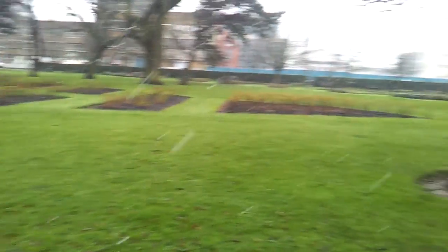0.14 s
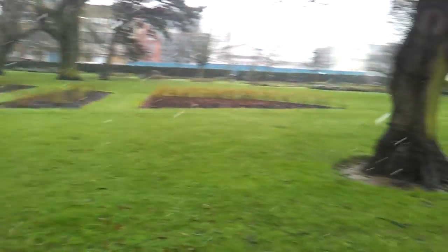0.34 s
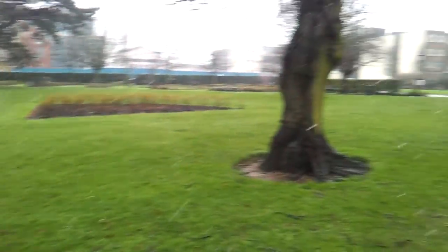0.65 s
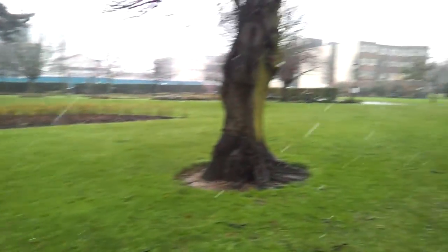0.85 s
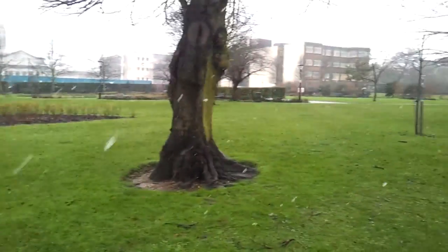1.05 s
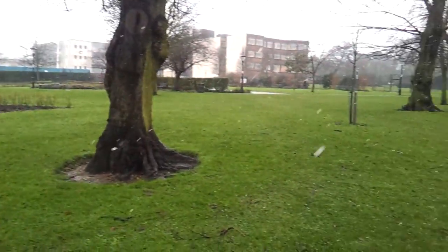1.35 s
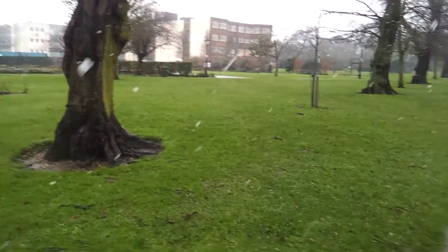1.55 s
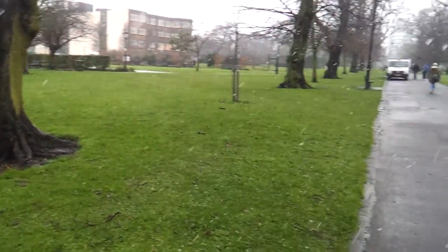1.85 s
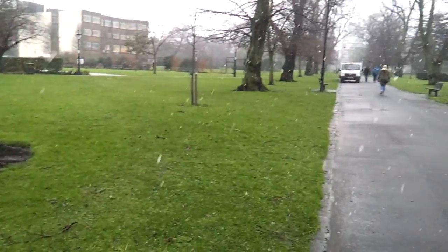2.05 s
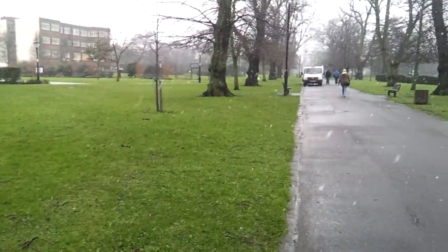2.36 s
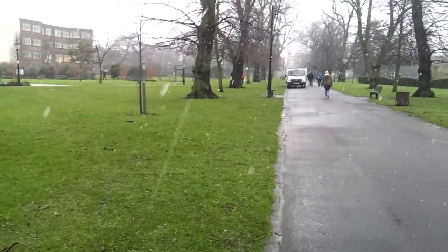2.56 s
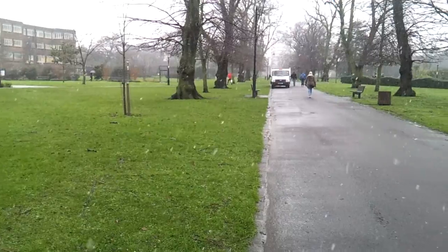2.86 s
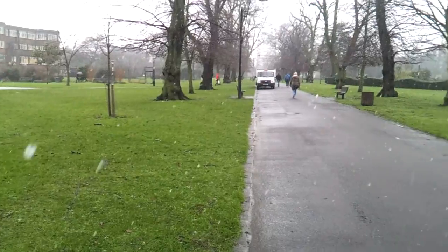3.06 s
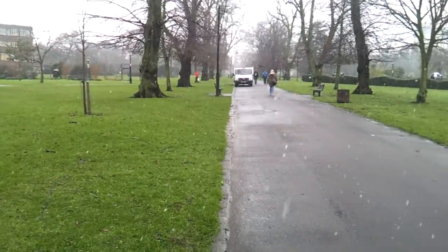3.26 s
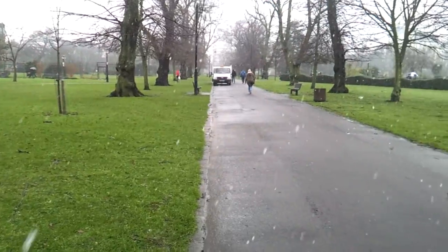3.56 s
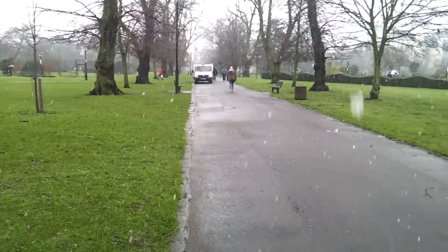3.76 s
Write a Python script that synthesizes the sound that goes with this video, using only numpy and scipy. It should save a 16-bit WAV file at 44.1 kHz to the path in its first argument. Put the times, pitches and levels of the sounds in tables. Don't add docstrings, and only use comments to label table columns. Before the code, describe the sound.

Wet sleet hisses steadily over an open park, with faint traffic and small handling bumps

```python
import sys
import numpy as np
from scipy import signal
from scipy.fft import rfft, irfft
from scipy.io import wavfile
from scipy.ndimage import uniform_filter1d

SR = 44100
rng = np.random.default_rng(int(sys.argv[2]) if len(sys.argv) > 2 else 0)


def voltage_ratio(decibels):
    exponent = np.asarray(decibels, float) / 20
    return 10 ** exponent


def digitize_waveform(pressure):
    field = np.atleast_2d(pressure).T
    bounded = np.clip(field, -1, 1)
    quanta = np.round(bounded * 32767).astype(np.int16)
    wavfile.write(sys.argv[1], SR, quanta)


N = 171990

# [t/s, level/dB]
SLEET_LEVEL = [(0.0, -47.5), (0.44, -50), (1.05, -48), (1.32, -51), (1.56, -51.5), (1.76, -49), (2.22, -48),
               (2.61, -52), (3.12, -52), (3.41, -54.5), (3.9, -53)]
# [f/Hz, level/dB per Hz]
FLAKE_COLOUR = [(600, -19.5), (1500, -1), (2500, 2), (3800, 0.5), (5000, 0.5), (6200, -1.5), (8000, -11.5)]
# [f/Hz, level/dB per Hz]
TOWN_COLOUR = [(25, -13), (90, -11), (230, -7), (500, -14.5), (1000, -12), (1500, -15.5), (2500, -23.5),
               (5000, -37)]
# [t/s, level/dB]
ROAD_LEVEL = [(0.0, -43), (0.52, -43), (0.82, -43.5), (1.37, -42.5), (2.01, -44.5), (3.55, -43.5),
              (3.9, -46.5)]
# [t/s, level/dB]
RUMBLE_LEVEL = [(0.0, -47.5), (0.18, -44.5), (0.53, -47), (1.39, -46.5), (1.72, -44), (2.22, -43.5),
                (2.6, -45.5), (3.5, -44), (3.9, -44.5)]
# [f/Hz, level/dB per Hz]
ENGINE_COLOUR = [(15, -25), (28, -10), (60, 4.5), (86, 2), (105, -2), (130, -0.5), (200, -17), (400, -34)]
# [t/s, length/s, hiss level/dB, body level/dB, body f/Hz]
CLOTH_SCUFFS = [(0.048, .03, -58, -46, 2280), (0.115, 0.038, -68, -47, 2290),
                (.216, .028, -58, -42.5, 2250), (2.343, .012, -56, -45, 2200), (.988, .022, -49, -44, 900),
                (1.037, .03, -52, -45, 1000), (1.5345, .015, -40, -45, 1600),
                (1.5535, .017, -41, -46, 2900), (1.105, .16, -57.5, -57, 905),
                (1.581, 0.21, -53, -53.5, 1400), (2.034, .04, -53.5, -48.5, 1910),
                (2.135, 0.036, -61, -65, 2180), (2.186, 0.24, -65, -50.5, 1950),
                (2.425, 0.028, -67, -46.5, 2080)]
# [f/Hz, level/dB per Hz]
RASP_COLOUR = [(1500, -24), (2500, -14), (3600, -7), (4800, -3), (5900, 0), (6800, -.5), (7400, -1),
               (8600, -4)]
# [t/s, peak level/dB, ring f/Hz]
THREAD_CATCHES = [(1.5346, -27, 5900), (1.5364, -30, 5200), (1.5384, -30, 5900), (1.5398, -28, 6000),
                  (1.5415, -26, 4500), (1.5436, -28, 6400), (1.5456, -27, 6500), (1.5472, -33, 3200),
                  (1.5504, -29, 5300), (1.5571, -27, 5400), (1.5556, -33, 4600), (1.5587, -28, 4400),
                  (1.5607, -26, 4700), (1.5633, -26, 4300), (1.565, -31, 3900), (1.5645, -28, 6000),
                  (1.567, -31, 5300), (1.569, -33, 5800), (1.571, -34, 5800), (.9907, -33, 4600),
                  (.9954, -38, 6200), (.9997, -38, 6200), (1.0419, -37, 6000), (1.0437, -35, 6100),
                  (1.0492, -37, 5300)]
# [t/s, peak level/dB, ring f/Hz]
FLAKE_TICKS = [(.1775, -34, 6600), (.2045, -36, 6000), (.4465, -36, 7000), (.837, -36, 6400),
               (.8615, -33.5, 6300), (.8843, -40, 6300), (.9355, -38, 6000), (.62, -41, 6300),
               (.984, -30, 6200), (.9888, -33, 5200), (1.002, -33, 5500), (1.9355, -36, 6200),
               (2.0368, -36, 4500), (2.0415, -37, 4800), (2.043, -35, 2900), (2.054, -39, 6000),
               (2.0582, -36, 4400), (2.332, -39, 6300), (2.6602, -39, 6800), (3.0904, -32, 6100),
               (3.1887, -40, 6700), (3.2143, -38, 4600), (3.2901, -41, 6800), (3.7892, -42, 5600),
               (3.5927, -32, 5600), (3.5952, -35, 5800), (3.628, -37, 5400), (3.6372, -36, 5800)]
# [t/s, peak level/dB, f/Hz, ring/s]
SHORT_RINGS = [
    (.228, -45, 4600, .005),
    (1.541, -36, 7300, .002),
    (1.5345, -37, 1620, .003),
    (1.065, -37, 1020, .003),
    (1.5645, -37, 1350, .002),
    (1.5705, -38, 1420, .002),
    (1.5372, -38, 5800, .002),
    (1.5632, -31, 5650, .001),
    (1.569, -42, 5600, .002),
]
# [t/s, peak level/dB, f/Hz, length/cycles]
CASE_BUMPS = [
    (.9893, -19.5, 280, .22),
    (.9889, -30, 1000, .3),
    (.9955, -35, 230, .4),
    (3.308, -35, 215, 1.1),
    (2.0387, -25.5, 1250, .3),
    (2.0609, -28, 1400, .3),
    (2.0656, -32, 1600, .3),
    (1.9362, -30, 1300, .4),
    (1.551, -31, 1400, .4),
    (2.4341, -34, 240, .5),
]
# [f/Hz, level/dB]
TREBLE_RESPONSE = [(6300, 0), (6900, -3), (7400, -9.5), (7750, -21), (8000, -44.5), (8300, -25), (8750, -28.5),
                   (9400, -58.5)]


def table(rows, hz):
    rows = np.array(rows)
    return np.interp(np.log(hz + 1), np.log(rows[:, 0]), rows[:, 1])


def follow(rows, t):
    rows = np.array(rows)
    return voltage_ratio(np.interp(t, rows[:, 0], rows[:, 1]))


def colour(x, rows):
    hz = np.arange(N // 2 + 1) * SR / N
    return irfft(rfft(x) * voltage_ratio(table(rows, hz)), N)


def band(x, hz, width):
    b, a = signal.iirpeak(hz, hz / width, fs=SR)
    return signal.lfilter(b, a, x)


def unit(x):
    return x / np.sqrt(np.mean(x ** 2))


def walk(rate):
    hold = int(SR / rate)
    steps = np.repeat(rng.standard_normal(N // hold + 1), hold)
    smooth = uniform_filter1d(uniform_filter1d(steps, hold), hold)[:N]
    return smooth / np.std(smooth)


def sleet(t):
    flakes_per_s, scatter_db, splash_s = 6000, 2.5, 0.0051
    count = int(flakes_per_s * N / SR)
    landing = rng.integers(0, N, size=count)
    energy = voltage_ratio(scatter_db * rng.exponential(size=count)) ** 2
    hits = np.zeros(N)
    np.add.at(hits, landing, energy)
    power = signal.lfilter([1], [1, -np.exp(-1 / (splash_s * SR))], hits)
    patter = unit(colour(np.sqrt(power) * rng.standard_normal(N), FLAKE_COLOUR))
    return patter * follow(SLEET_LEVEL, t) * voltage_ratio(2 + 0.33 * walk(17))


def town(t):
    level_db, swell_db, flicker_db = 3, -0.02, 0.7
    hz = np.arange(N // 2 + 1) * SR / N + 1
    swell = walk(0.94)
    roar = 0
    for step in range(18):
        distance = np.abs(2 * np.log2(hz / 25) - step)
        shape = np.clip(1 - distance, 0, 1) ** 0.5
        spectrum = rfft(rng.standard_normal(N)) * shape * voltage_ratio(table(TOWN_COLOUR, hz))
        roar = roar + irfft(spectrum, N) * voltage_ratio(swell_db * swell + flicker_db * walk(8.09))
    return unit(roar) * voltage_ratio(level_db) * follow(ROAD_LEVEL, t)


def rumble(t):
    throb = unit(colour(rng.standard_normal(N), ENGINE_COLOUR))
    return throb * follow(RUMBLE_LEVEL, t) * voltage_ratio(1.5)


def scuffs(t):
    attack_s, release_s, body_share = 0.001, 0.005, 0.4
    noise = rng.standard_normal((2, N)) * voltage_ratio(2.0001 * walk(300))
    rasp = colour(noise[0], RASP_COLOUR)
    rasp = rasp / np.std(colour(rasp, TREBLE_RESPONSE))
    out = 0
    for start, length, hiss_db, body_db, hz in CLOTH_SCUFFS:
        rise = np.clip((t - start) / attack_s, 0, 1)
        fall = np.exp(-np.clip(t - start - length, 0, 1) / release_s)
        width = hz * body_share
        body = unit(band(band(noise[1], hz, width), hz, width))
        out = out + rise * fall * (voltage_ratio(hiss_db) * rasp + voltage_ratio(body_db) * body)
    return out


def ticks(t):
    width_hz, rise_s, level_db = 2500, 0.00035, 0.5
    out, noise = np.zeros(N), rng.standard_normal(N)
    for start, db, hz in FLAKE_TICKS + THREAD_CATCHES:
        span = slice(int(start * SR), int((start + 0.01) * SR))
        age = np.clip(t[span] - start, 0, 1) / rise_s
        spit = noise[span] * age * np.exp(1 - age)
        ring = band(band(spit, hz, width_hz), hz, width_hz)
        out[span] += ring / np.max(np.abs(ring)) * voltage_ratio(db + level_db)
    return out


def short_rings(t):
    out = 0
    for start, db, hz, ring_s in SHORT_RINGS:
        age = np.clip((t - start) / ring_s, 0, 50)
        out = out + voltage_ratio(db) * np.sin(2 * np.pi * hz * t) * age * np.exp(1 - age)
    return out


def bumps(t):
    edge, rebound, slowing = 2.2, 0.9, 0.9
    out = 0
    for at, db, hz, cycles in CASE_BUMPS:
        turn = (t - at) * hz
        swing = np.cos(2 * np.pi * turn / (1 + slowing * np.clip(turn, 0, 1)))
        length = cycles * (1 + rebound * (turn > 0))
        out = out + voltage_ratio(db) * np.tanh(edge * swing) * np.exp(-(turn / length) ** 2 / 2)
    return out


def scene():
    t = np.arange(N) / SR
    background = sleet(t) + town(t) + rumble(t)
    close_by = scuffs(t) + ticks(t) + short_rings(t) + bumps(t)
    return (background + close_by)[None]


def band_limit(x):
    return signal.sosfilt(signal.butter(12, 9100, fs=SR, output="sos"), x)


def record(dry):
    mix = colour(dry[0], TREBLE_RESPONSE)[None]
    return band_limit(mix)


dry = scene()
out = record(dry)
digitize_waveform(out)
```